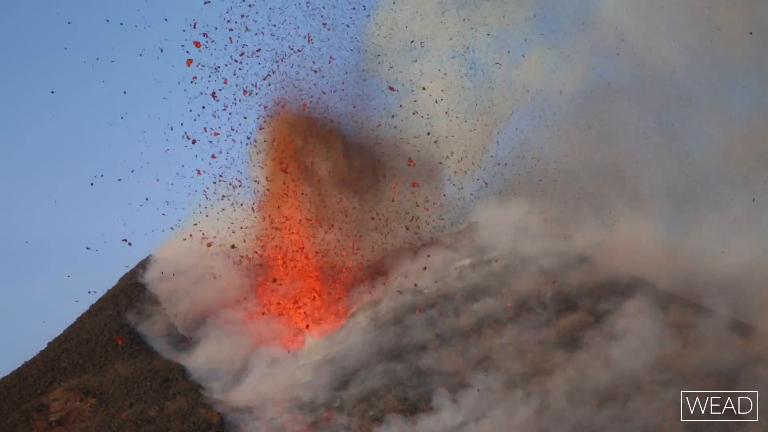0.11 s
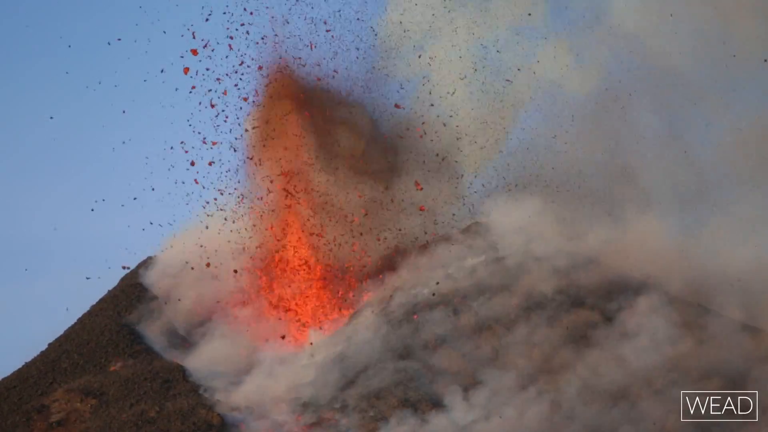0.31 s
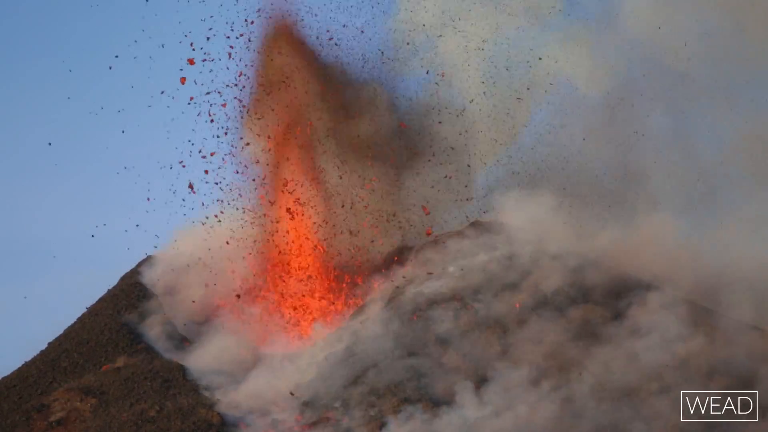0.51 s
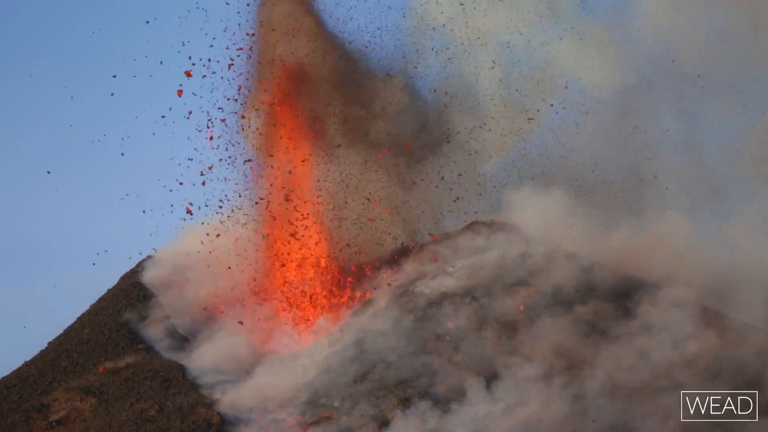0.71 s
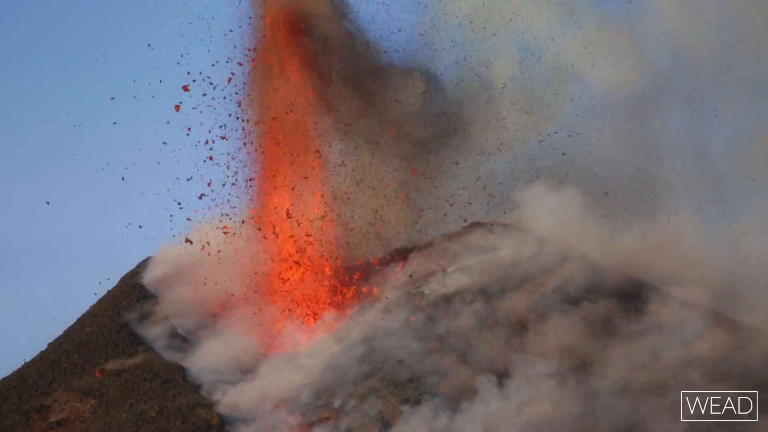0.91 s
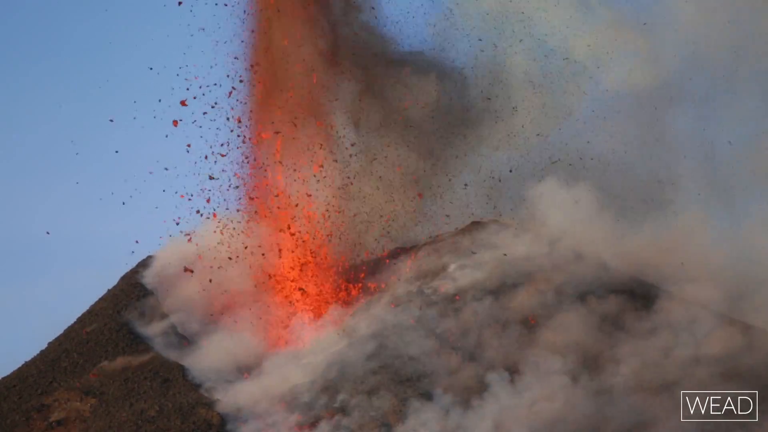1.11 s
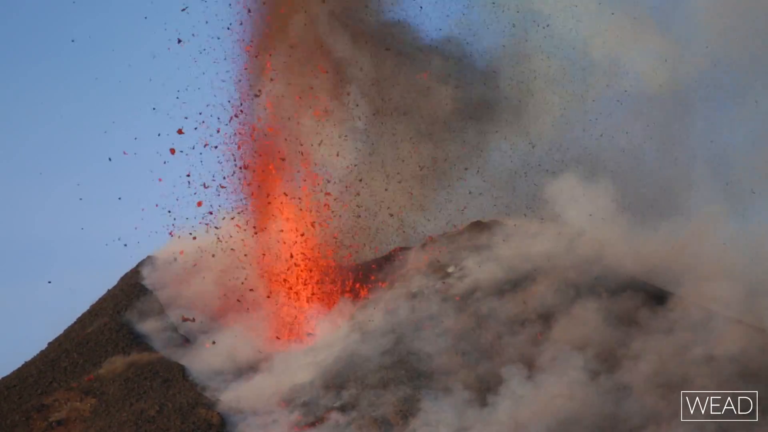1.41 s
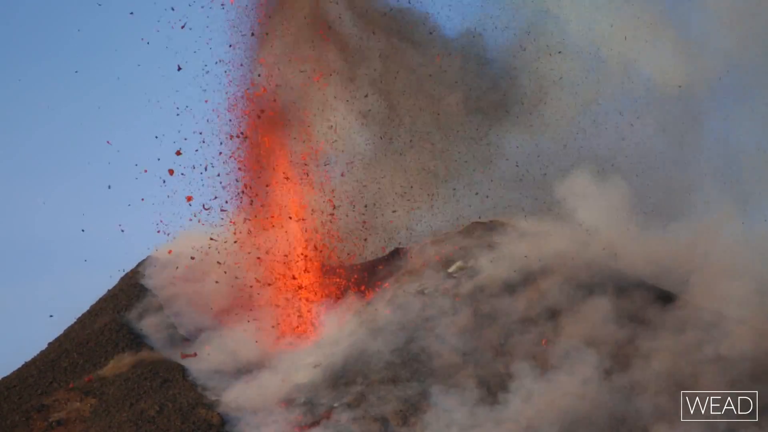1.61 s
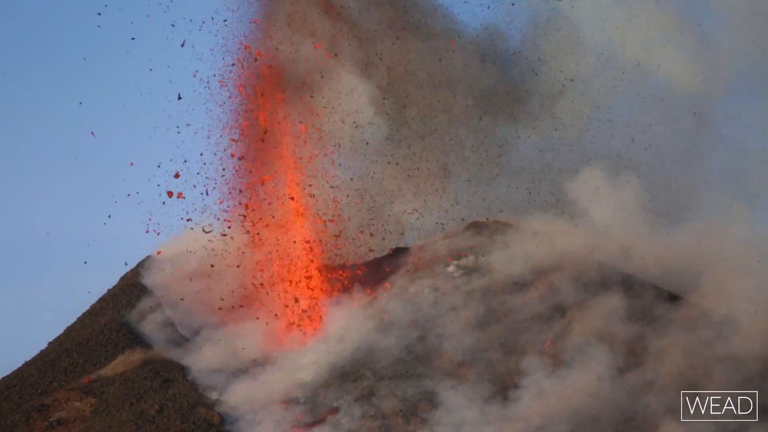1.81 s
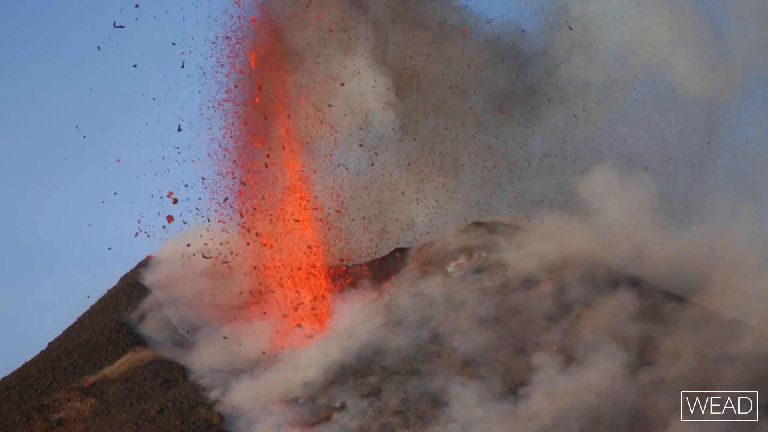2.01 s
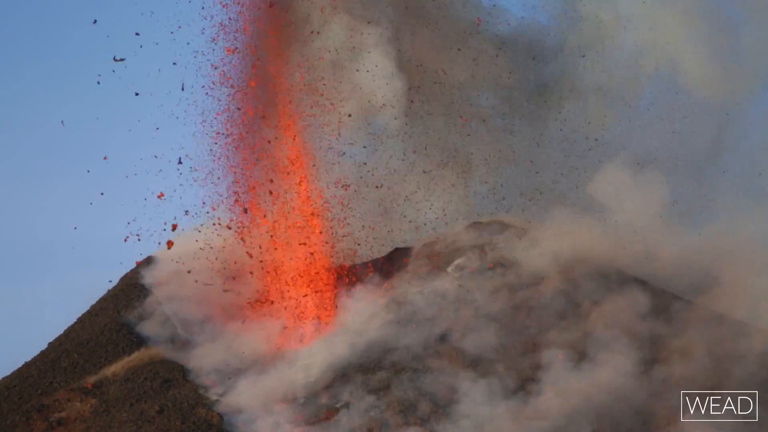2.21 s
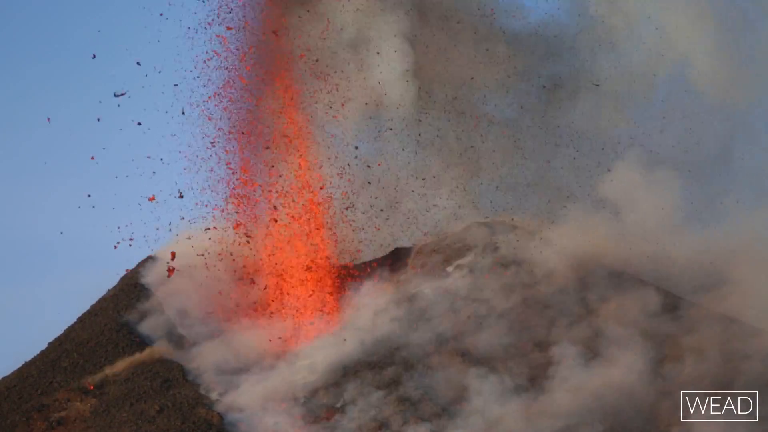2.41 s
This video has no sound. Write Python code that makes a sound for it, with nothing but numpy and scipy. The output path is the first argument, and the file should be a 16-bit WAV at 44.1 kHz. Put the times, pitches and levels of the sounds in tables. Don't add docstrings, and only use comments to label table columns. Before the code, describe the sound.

A volcanic explosion heard across open mountain air. Low ground tremor and quiet rumble lead in; at 0.2 s a dull, massive blast bursts out, with harsh clipped cracks around 0.25-0.33 s. A second surge overloads near 0.6 s. Thunder-like, lumpy booms echo off slopes, weakening from 1 to 1.6 s. Faint rumble remains, with weak breathy puffs near 1.9 and 2.4 s.

```python
import sys
import numpy as np
from scipy import signal
from scipy.fft import rfft, irfft
from scipy.io import wavfile
from scipy.ndimage import uniform_filter1d, minimum_filter1d

SR = 44100
rng = np.random.default_rng(int(sys.argv[2]) if len(sys.argv) > 2 else 0)


def transcribe(u):
    v = np.clip(np.atleast_2d(u).T, -1, 1)
    q = np.round(v * 32767).astype(np.int16)
    wavfile.write(sys.argv[1], SR, q)


def level_to_linear(level):
    exponent = np.asarray(level, float) / 20
    return 10 ** exponent


N = 114660

# pitch_hz, level_db
TREMOR_SPECTRUM = [(20, -25.5), (60, 4.5), (125, 9.5), (200, -1), (300, -46.5), (900, -100)]
# pitch_hz, level_db
RUMBLE_SPECTRUM = [(20, -6.5), (200, -3), (750, -9.5), (950, -18.5), (1600, -33), (3200, -38.5),
                   (3700, -47), (9000, -56.5)]
# time_s, force_db, brightness_db (of the upper roar)
ERUPTION_FORCE = [(0, -48, -30), (0.17, -42, -3), (0.211, -18, -0.5), (0.301, -12.5, 5), (.4, -15.5, -3),
                  (0.572, -17, -1), (.65, -9, -2), (.78, -15, -9), (1.038, -24.5, -5.5),
                  (1.238, -25.5, -4.5), (1.501, -31.5, -8.5), (1.702, -49.5, -5.5), (1.87, -46.5, -7),
                  (1.909, -36, -3), (1.975, -37, -1), (2.03, -41, -7.5), (2.3, -42.5, -9),
                  (2.408, -39, 1.5)]
# pitch_hz, level_db
BOOM_SPECTRUM = [(20, -55), (60, -16), (120, -6), (190, -2), (260, -8.5), (400, -18), (700, -43),
                 (2500, -130)]
# pitch_hz, level_db
ROAR_SPECTRUM = [(120, -40), (300, -10.5), (480, -5), (720, -9.5), (1000, -28), (1400, -37.5), (3200, -63),
                 (7000, -125)]
# centre_s, peak_db, pitch_hz, length_cycles
SLOPE_ECHOES = [(0.212, -13.5, 420, 4.4), (.2985, -7.5, 230, 1.34), (.345, -8.5, 142.6, 4.4),
                (.59, -8, 144.5, 5.6), (0.646, -9, 152.5, 1.8), (0.671, -8.5, 190, 3.6),
                (0.746, -7.5, 200, 3.7), (.775, -5.5, 194, 2.6), (.865, -11.5, 170, 3.9),
                (0.904, -5, 250, 1.12), (0.963, -9.5, 200, 1.76), (1.115, -22, 170, 2.2),
                (1.19, -11, 220, 1.8), (1.231, -11, 220, 2), (1.3, -13, 245, 5.7), (1.374, -29, 180, 5.8),
                (1.44, -18, 225, 2.2), (1.511, -28.5, 190, 1.06), (1.548, -27, 190, 3),
                (1.912, -27, 170, 2.5), (1.952, -22, 200, 1.9), (2.412, -28.5, 140, 1.8),
                (2.458, -20.5, 420, 3.8), (.505, -11, 580, 1.1), (.537, -20.5, 652, 3),
                (.742, -9, 600, 2.7), (.778, -14, 648, 3), (1.132, -27, 600, 5.2), (1.283, -19.5, 623, 4.8)]
# centre_s, peak_db, pitch_hz, length_cycles
OVERLOADS = [
    (.2546, 1, 380, 1.8),
    (.2699, .6, 480, 2.2),
    (.3139, .5, 300, 1.7),
    (.3232, 2.6, 400, 1.7),
    (.3299, .7, 260, 1.7),
    (.6042, .3, 240, 1.8),
    (.6233, .3, 208, 4.5),
    (.62, -8.5, 600, 3),
    (.6249, -8.5, 560, 3),
    (.6326, -4.4, 330, 1.8),
]
# start_s, level_db, rise_s, fall_db_per_s
GAS_JETS = [
    (1.86, -51.5, 0.048, 35),
    (2.33, -60.5, 0.027, 30),
]
# pitch_hz, level_db
JET_SPECTRUM = [(400, -2.5), (900, 1), (1500, -0.5), (2100, -13.5), (3200, -15), (3900, -48.5)]
# pitch_hz, level_db
HISS_SPECTRUM = [(100, 0), (8000, 0.5), (13500, -3.5)]


def evened(x):
    return x / np.sqrt(np.mean(x ** 2) + 1e-20)


def coloured(x, spectrum):
    point_hz, level_db = np.transpose(spectrum)
    hz = np.fft.rfftfreq(N, 1 / SR)
    gain_db = np.interp(np.log(hz + 1), np.log(point_hz), level_db)
    return irfft(rfft(x) * level_to_linear(gain_db), N)


def steadied(x):
    even = evened(x)
    power = uniform_filter1d(uniform_filter1d(even ** 2, size=2000), size=2000)
    return even / np.sqrt(power + 1e-3)


def drift(per_s):
    t = np.arange(N) / SR
    phases = rng.random(24)
    rates_hz = np.geomspace(1 / 4, 1, 24) * per_s
    return evened(sum(np.sin(2 * np.pi * (f * t + p)) for f, p in zip(rates_hz, phases)))


def tremor():
    level_db, end_s, fall_db_per_s = -39, 0.16, 9
    late_s = np.maximum(np.arange(N) / SR - end_s, 0)
    shaking = steadied(coloured(rng.standard_normal(N), TREMOR_SPECTRUM))
    return level_to_linear(level_db - fall_db_per_s * late_s) * shaking


def rumble():
    level_db = -45.5 + 0.51 * drift(2)
    return level_to_linear(level_db) * evened(coloured(rng.standard_normal(N), RUMBLE_SPECTRUM))


def arrivals():
    fronts_per_s, spread_db, haze_level = 2500, 1.5, 0.6
    hit = rng.random(N) < fronts_per_s / SR
    size = np.minimum(rng.exponential(1, N), 4)
    sign = rng.choice([-1., 1.], N)
    haze = rng.standard_normal(N)
    return evened(hit * sign * level_to_linear(spread_db * size)) + haze_level * haze


def fronts(rows):
    centre_s, peak_db, hz, cycles = np.transpose(rows)[:, :, None]
    t = np.arange(N) / SR - centre_s
    bell = np.exp(-(2.2 * t * hz / np.maximum(cycles, 1.7)) ** 2)
    swings = -(level_to_linear(peak_db) * bell * np.cos(2 * np.pi * hz * t)).sum(0)
    cover = 1 - (1 - np.sqrt(bell)).prod(0)
    return swings, cover


def roll():
    time_s, force_db, bright_db = np.transpose(ERUPTION_FORCE)
    t = np.arange(N) / SR
    shared = arrivals()
    lumps = drift(49)
    boom = steadied(coloured(shared, BOOM_SPECTRUM)) * level_to_linear(0.4 * lumps)
    roar = steadied(coloured(shared + 0.38 * arrivals(), ROAR_SPECTRUM))
    roar = roar * level_to_linear(np.interp(t, time_s, bright_db) + 0.73 * lumps)
    echoes, cover = fronts(SLOPE_ECHOES)
    blast = boom * (1 - 0.28 * cover) + roar
    return blast * level_to_linear(np.interp(t, time_s, force_db)) + echoes


def jets():
    start_s, level_db, rise_s, fall_db_per_s = np.transpose(GAS_JETS)[:, :, None]
    t = np.arange(N) / SR - start_s
    fall_db = fall_db_per_s * np.maximum(t - rise_s, 0)
    shape = np.clip(t / rise_s, 0, 1) * level_to_linear(level_db - fall_db)
    return shape.sum(0) * evened(coloured(rng.standard_normal(N), JET_SPECTRUM))


def held(x):
    ceiling_db, window = -3, 661
    gain = np.minimum(level_to_linear(ceiling_db) / (abs(x) + 1e-9), 1)
    lowest_gain = minimum_filter1d(gain, size=window)
    return x * signal.oaconvolve(lowest_gain - 1, np.hanning(window) / 330, "same") + x


def scene():
    low_cut_hz, split_hz, masking = 42.6, 800, 0.95
    swings, cover = fronts(OVERLOADS)
    bass_cut = signal.butter(2, low_cut_hz, "high", fs=SR, output="sos")
    rest = held(signal.sosfilt(bass_cut, roll() + tremor()) + jets() + rumble())
    low = signal.sosfiltfilt(signal.butter(4, split_hz, fs=SR, output="sos"), rest)
    return (rest - masking * cover * low + swings)[None]


def roll_off(x):
    return signal.sosfilt(signal.butter(12, 14100, fs=SR, output="sos"), x)


def record(dry):
    edge_s, hiss_db = 0.004, -78
    t = np.arange(N) / SR
    edges = np.sin(np.pi / 2 * np.clip(np.minimum(t, t[-1] - t) / edge_s, 0, 1)) ** 2
    hiss = level_to_linear(hiss_db) * coloured(rng.standard_normal(N), HISS_SPECTRUM)
    mix = np.clip(edges * dry + hiss, -1, 1)
    return roll_off(mix)


dry = scene()
out = record(dry)
transcribe(out)
```